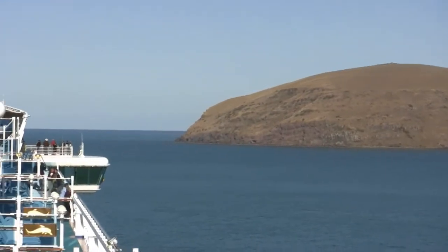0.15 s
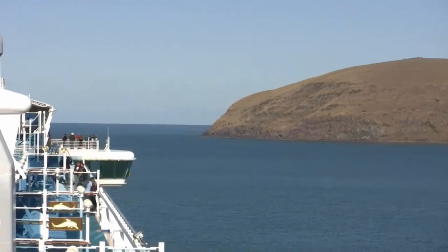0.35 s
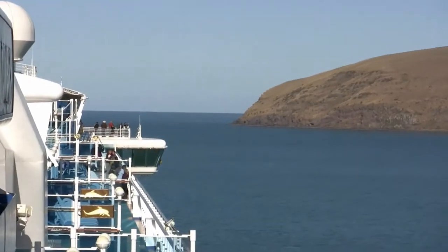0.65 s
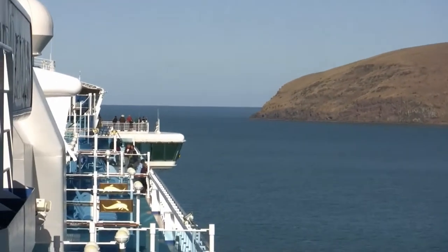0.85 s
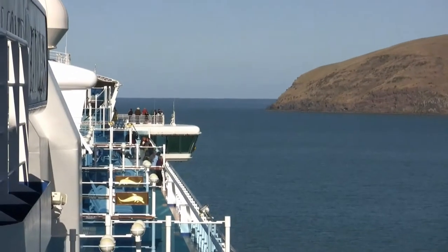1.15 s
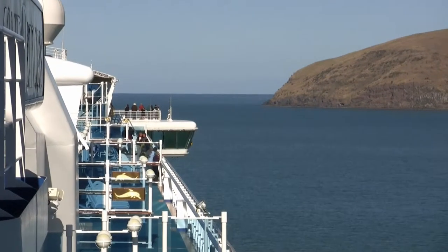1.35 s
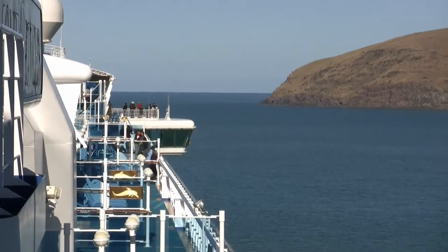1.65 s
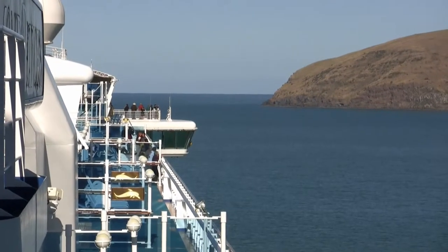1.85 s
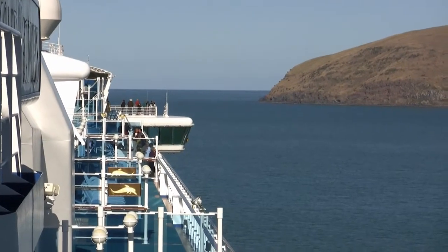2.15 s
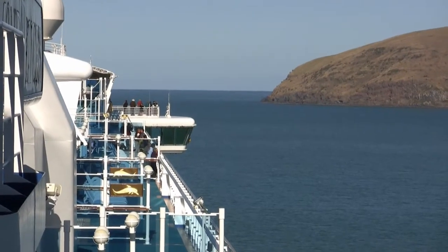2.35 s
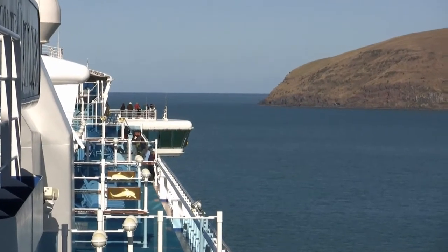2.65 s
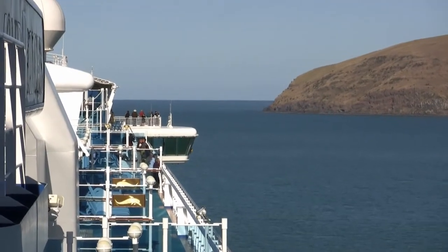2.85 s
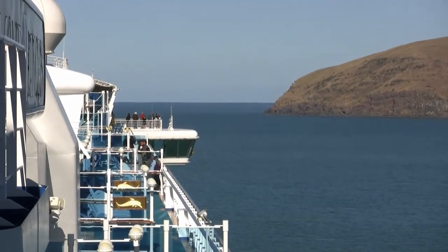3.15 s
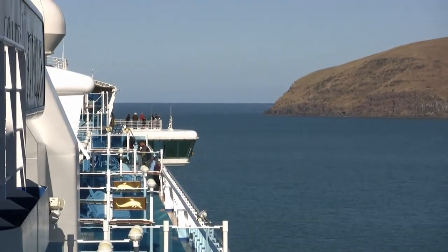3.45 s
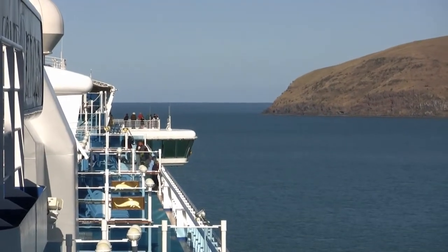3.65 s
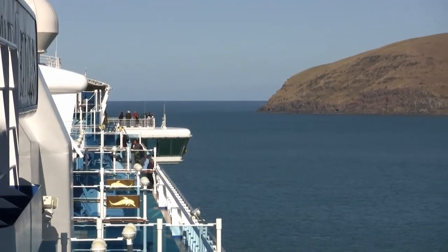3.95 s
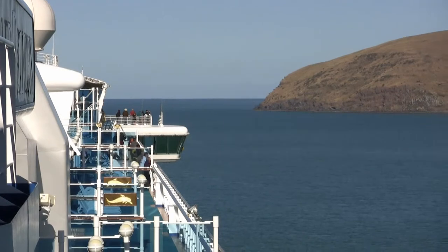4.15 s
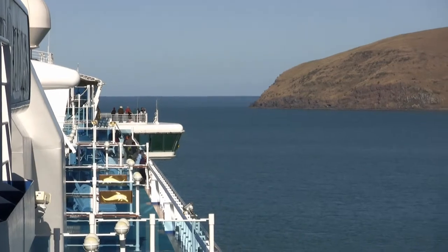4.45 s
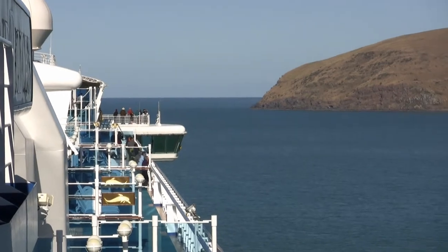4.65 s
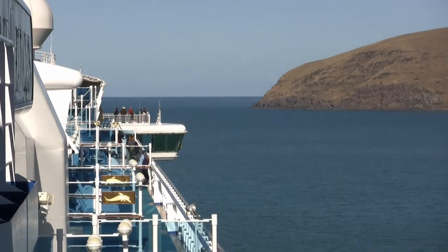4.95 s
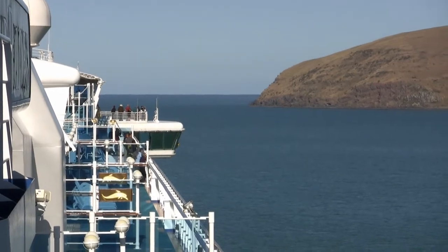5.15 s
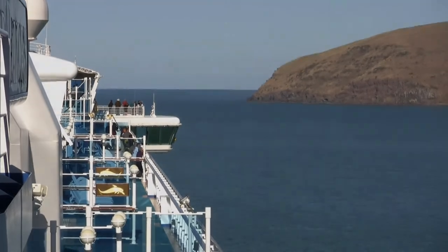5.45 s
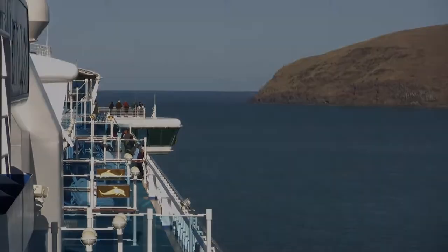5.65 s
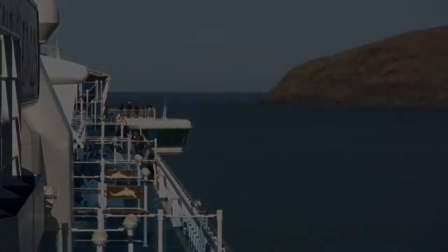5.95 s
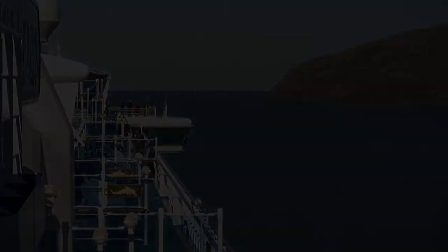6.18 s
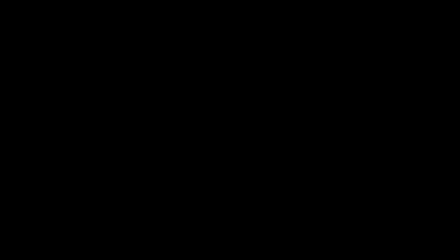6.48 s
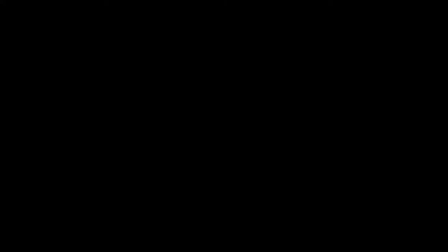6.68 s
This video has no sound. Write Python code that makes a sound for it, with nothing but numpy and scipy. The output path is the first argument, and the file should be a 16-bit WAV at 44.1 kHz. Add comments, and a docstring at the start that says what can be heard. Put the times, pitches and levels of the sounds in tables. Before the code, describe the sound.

A large ship under way: deep diesel pulsing about four times a second beneath humming ventilators and constant rushing air, gradually fading but not to silence.

```python
"""High on the open deck of a large ship under way: a slow diesel throbs in the funnel, as tones that sweep upward.
Ventilation fans hum as slowly wavering sine tones, with a thin motor whine that dips once.
Exhaust and vent air roar steadily: noise coloured by ducts, and scattered off decks and sea.
Two small microphone ports hear it slightly differently; the treble flickers, and the end fades."""
import sys
import numpy as np
from scipy import signal
from scipy.fft import rfft, irfft, next_fast_len
from scipy.io import wavfile
from scipy.ndimage import uniform_filter1d

SR = 44100
rng = np.random.default_rng(int(sys.argv[2]) if len(sys.argv) > 2 else 0)


def file_out(sig):
    """Save sig as 16-bit WAV at sys.argv[1]."""
    # one column per channel
    cols = np.atleast_2d(sig).T
    # limit, then scale
    lim = np.clip(cols, -1, 1)
    pcm = np.round(lim * 32767).astype(np.int16)
    wavfile.write(sys.argv[1], SR, pcm)


def magnitude_from_level(level_db):
    """Linear magnitude for a level in decibels (20 dB per decade)."""
    exponent = np.asarray(level_db, float) / 20
    return 10 ** exponent


N = 300747  # length in samples
T = np.arange(N) / SR  # time in seconds
F = np.maximum(np.fft.rfftfreq(next_fast_len(N), 1 / SR), 1)  # frequencies of the filters in Hz


def spectrum(table):
    """Gain at every frequency, joined up from (Hz, dB) points."""
    hz, db = np.transpose(table)
    return magnitude_from_level(np.interp(np.log(F), np.log(hz), db))


def shape(x, gain):
    """Filter a sound by one gain per frequency."""
    size = next_fast_len(N)
    return irfft(rfft(x, size) * gain, size)[..., :N]


def bands(x, centres):
    """Split a sound into overlapping bands that add up to the whole."""
    gains = [np.interp(np.log(F), np.log(centres), own) for own in np.eye(len(centres))]
    return [shape(x, gain) for gain in gains]


def walk(rate):
    """Smooth chance around 0 with spread 1, turning about rate times a second."""
    hold = int(SR / rate)
    steps = np.repeat(rng.standard_normal(N // hold + 1), hold)
    smooth = uniform_filter1d(uniform_filter1d(steps, hold), hold)[:N]
    return (smooth - smooth.mean()) / smooth.std()


def engine():
    """One throb a cycle; higher tones leave the long funnel later, so each throb sweeps upward."""
    # Four-stroke exhaust tones. Each row: multiple of the engine cycle, average level in dB rms.
    exhaust_tones = [(5, -64), (6, -62), (7, -52), (8, -44), (9, -47), (10, -38.5), (11, -54), (13, -52),
                     (16, -53)]
    cycle_hz = 4.272
    first_throb_s, sweep_s = .154, .041  # sweep_s: delay from one exhaust tone to the next
    throb = 0
    for multiple, db in exhaust_tones:
        cycles = multiple * (T - first_throb_s) - sweep_s * (multiple - 9) ** 2 / 2
        level = np.sqrt(2) * magnitude_from_level(db + .6 * walk(0.9))
        throb = throb + level * np.cos(2 * np.pi * cycle_hz * cycles)
    return throb


def tone(row, waver_db, wander, multiple=1):
    """A steady hum; moving air shakes its level and phase (wander in radians, growing with the multiple)."""
    hz, hz_per_s, db, db_per_s = row
    phase = 2 * np.pi * (hz * T + hz_per_s * T ** 2 / 2) + wander * walk(3)
    level = np.sqrt(2) * magnitude_from_level(db + db_per_s * T + waver_db * walk(3.1))
    return level * np.sin(multiple * phase)


def fans():
    """Blades chop the air into tones: two near fans, a rougher far one with overtones, and a motor whine."""
    # Blade tones and motor whine. Each holds: Hz at first, Hz per second, dB rms at first, dB per second.
    big_blade = (149.2, .06, -32.1, .17)
    small_blade = (266.65, .125, -34.6, -.45)
    far_blade = (298.3, 0, -51, 0)
    motor_whine = (1903.6, 0, -62.5, 0)
    # Tones of the far fan. Each row: multiple of the blade tone, level in dB relative to it.
    far_overtones = [(1, 0), (2, -2), (4, -11)]
    # The whine's one dip: middle in seconds, half width in seconds, level change in dB.
    middle_s, half_s, depth_db = (1.9, .4, -13)
    dip = magnitude_from_level(depth_db * np.exp(-((T - middle_s) / half_s) ** 2))
    near = tone(big_blade, .25, .05) + tone(small_blade, .5, .12)
    whine = dip * tone(motor_whine, 1.5, .3)
    far = sum(magnitude_from_level(db) * tone(far_blade, 1.5, .35, multiple) for multiple, db in far_overtones)
    return near + whine + far


def roar():
    """Turbulent air in ducts, straight and scattered; octave bands breathe a little on their own."""
    # Overall colour of exhaust and vent air. Each row: frequency in Hz, relative level in dB per Hz.
    air_colour = [(45, -7.5), (62, -8.5), (82, -13), (150, -6), (310, -9), (450, -9.5), (650, -13),
                  (1000, -19.5), (1850, -26.5), (2050, -30), (2600, -35.5), (4000, -43.5), (7000, -52),
                  (11000, -60.5), (16000, -71.5)]
    # Thinning of the roar below its lowest duct. Each row: frequency in Hz, gain in dB.
    bass_cut = [(12, -22), (20, -19), (29, -10), (40, 0)]
    # Duct resonances, or dips where negative. Each row: frequency in Hz, width in Hz, lift in dB.
    ducts = [(66, 18, 5), (103.7, 21.7, 6.5), (122, 22.7, 7), (136, 8.3, -2), (246, 21, 1.5),
             (316, 16, -1.5), (349, 14, 2), (394, 71, 2.5), (600, 59, 1.5), (663, 17, 2.5), (900, 78, 2),
             (1820, 110, -1)]
    # Sound scattered from decks and sea. Each row: frequency in Hz, level in dB relative to the straight roar.
    scatter = [(12, 9), (22, -1.5), (35, -16), (100, -22.5), (500, -16), (1000, -14), (2000, -9),
               (4000, -3), (8000, -1.5), (16000, 1)]
    # Brief swells of the roar. Each row: middle in seconds, half width in seconds, lift in dB.
    surges = [(3.4, .15, 0.5), (5.15, 0.17, 0.5)]
    straight_db = -28.5  # rms of the straight roar outside the surges

    duct_db = sum(db / (1 + (2 * (F - hz) / width) ** 2) for hz, width, db in ducts)
    colour = spectrum(air_colour) * spectrum(bass_cut) * magnitude_from_level(duct_db)
    paths = np.array([np.ones(len(F)), spectrum(scatter)])  # straight, scattered
    noise = shape(rng.standard_normal((2, N)), colour * paths)
    swell_db = 0.091 * walk(0.79)  # shared by all bands
    octaves = bands(noise, [63, 125, 250, 500, 1000, 2000, 4000])
    air = sum(magnitude_from_level(swell_db + 0.12 * walk(3.7)) * band for band in octaves)
    surge_db = sum(db * np.exp(-((T - middle_s) / half_s) ** 2) for middle_s, half_s, db in surges)
    return air * magnitude_from_level(straight_db + surge_db) / air[0].std()


def flicker(x):
    """The treble flickers: bands above a jumping ceiling are strongly weakened."""
    ceiling_hz, spread_octaves, hold_s = 10380, 0.38, .026  # middle, spread before smoothing, time per jump
    hold = int(hold_s * SR)
    jumps = np.repeat(rng.standard_normal(400), hold)[:N]
    jumps = uniform_filter1d(jumps, hold // 2)  # soften the edges
    ceiling = ceiling_hz * 2 ** (spread_octaves * jumps)
    centres = [5000, 6000, 7000, 8000, 9200, 10500, 12000, 13700, 15500]  # Hz
    body, *treble = bands(x, centres)
    return body + sum(band / (1 + (hz / ceiling) ** 9) for hz, band in zip(centres[1:], treble))


def scene():
    """The two ports roll off bass differently, tilt treble apart, and the left one hears slightly first."""
    # Treble colour of the ports. Each row: frequency in Hz, gain in dB on the left (and loss on the right).
    port_tilt = [(800, 0), (1100, -0.2), (2700, -0.25), (5000, .5), (6200, .1), (8500, -1.5), (10000, 0.5),
                 (11500, 2.5)]
    straight, scattered = roar()
    mid = straight + engine() + fans()
    bass_skew = -52 / (26 + 1j * F)
    lead = 1j * F / 15000 / (1 + (F / 5000) ** 4)  # left ahead of right, up to the low treble
    side = shape(mid, bass_skew + lead - .045) + scattered  # -.045 makes the left a little quieter
    tilt = spectrum(port_tilt)
    return np.array([shape(mid + side, tilt), shape(mid - side, 1 / tilt)])


def low_pass(x):
    """Removes everything above the highest recorded frequency."""
    return signal.sosfilt(signal.butter(12, 15200, fs=SR, output="sos"), x)


def record(dry):
    """The treble flickers, and the end fades in a straight line towards silence without reaching it."""
    fade_start_s, fade_length_s = 5.44, 2.57
    fade = np.clip(1 - (T - fade_start_s) / fade_length_s, 0, 1)
    mix = flicker(dry) * fade
    return low_pass(mix)


dry = scene()
out = record(dry)
file_out(out)
```